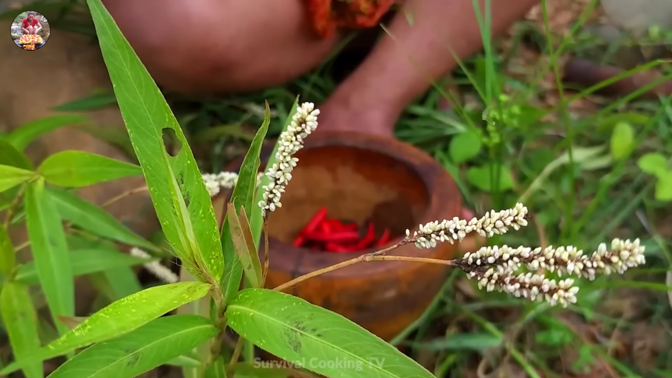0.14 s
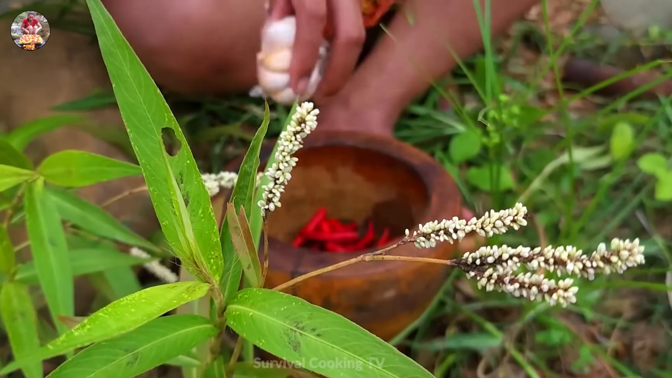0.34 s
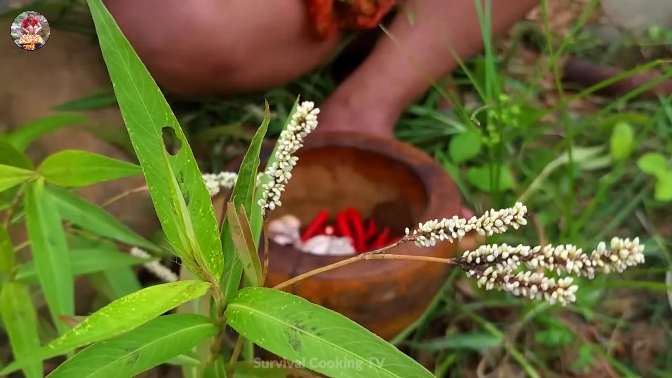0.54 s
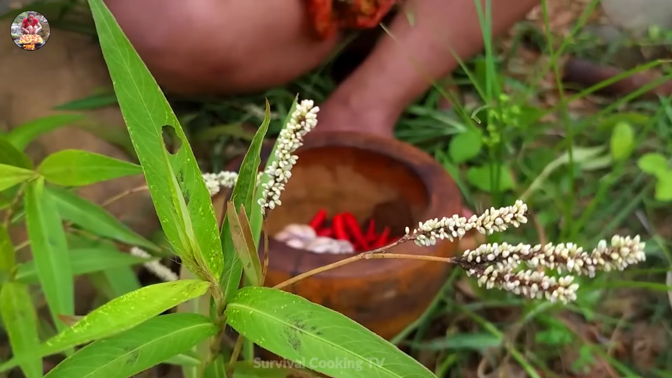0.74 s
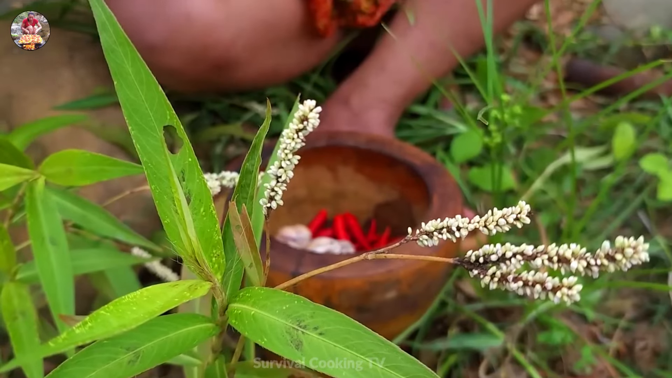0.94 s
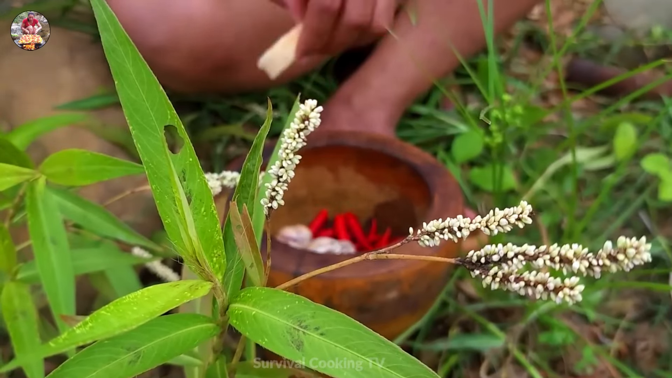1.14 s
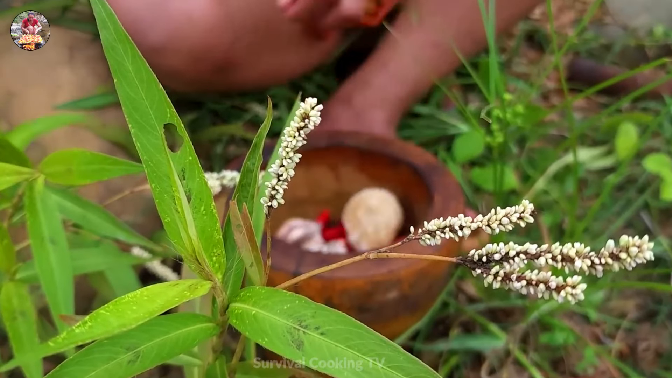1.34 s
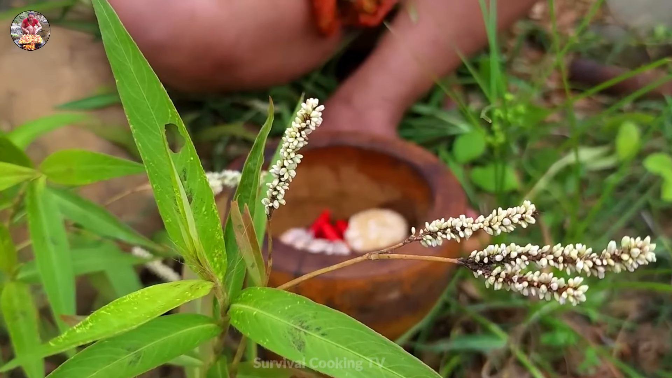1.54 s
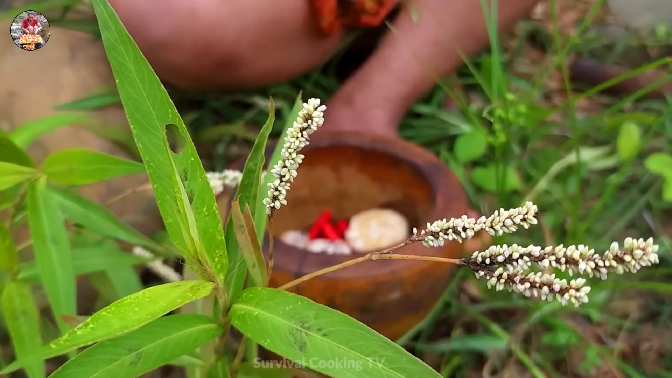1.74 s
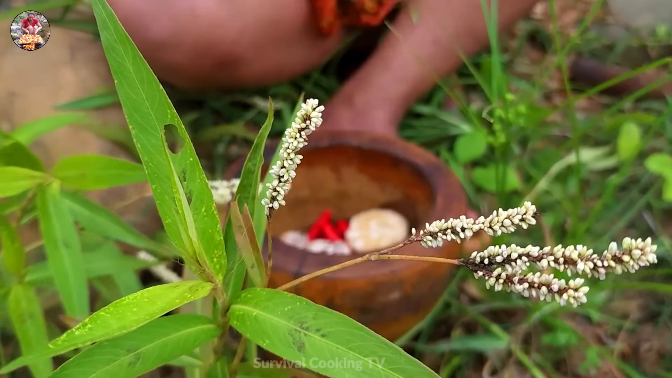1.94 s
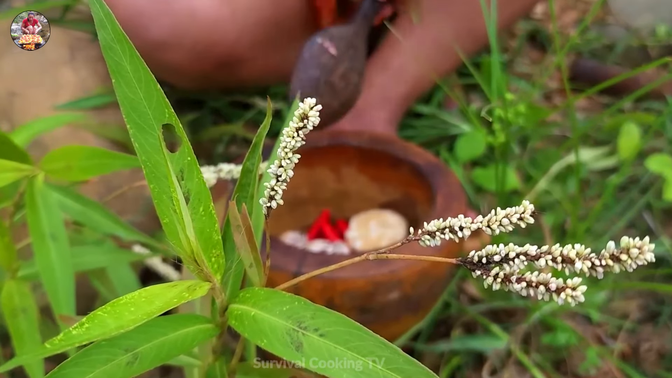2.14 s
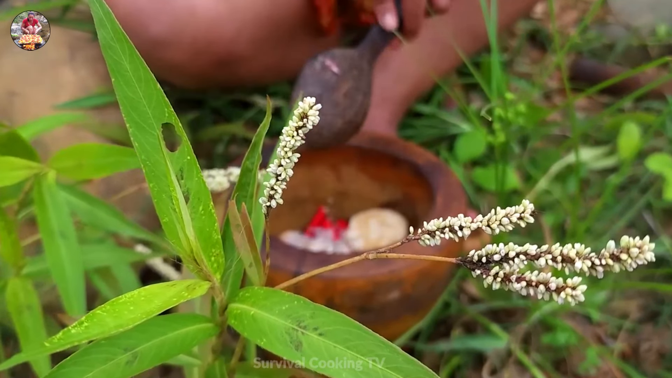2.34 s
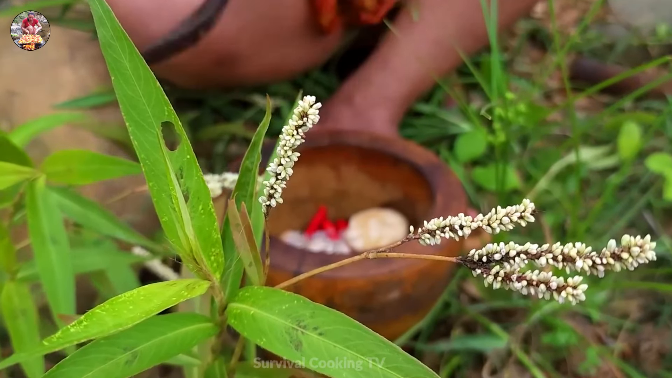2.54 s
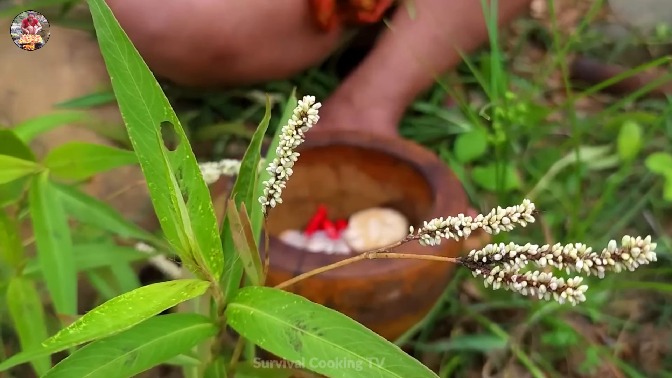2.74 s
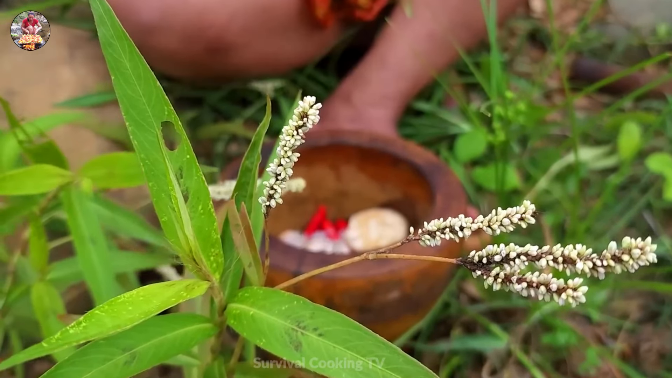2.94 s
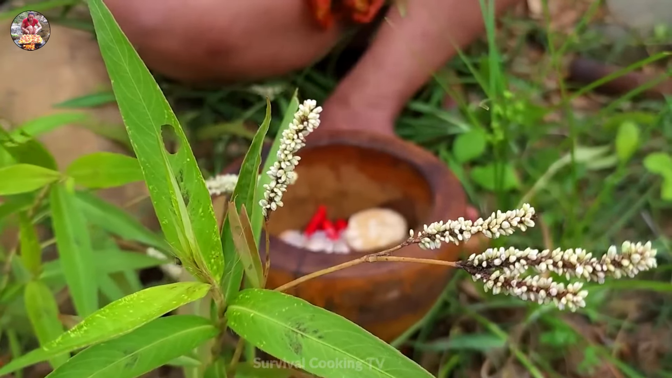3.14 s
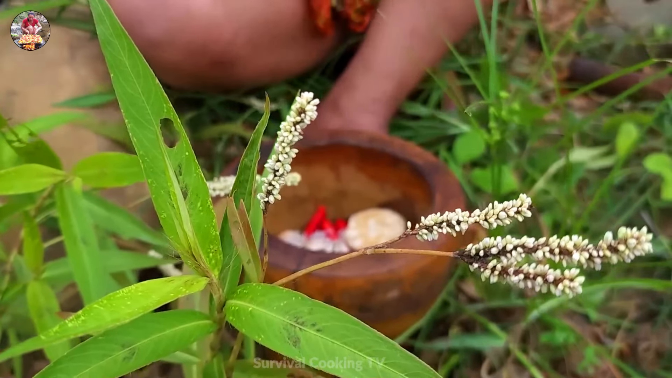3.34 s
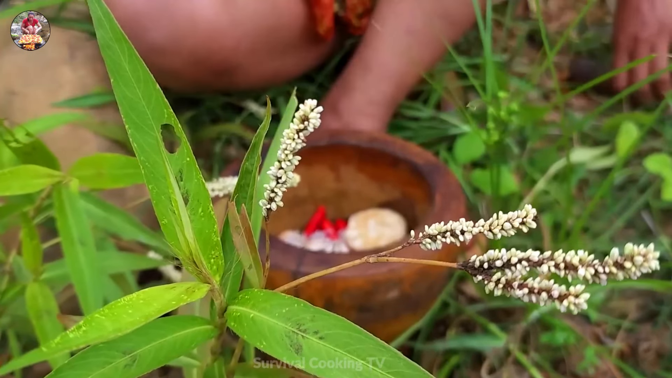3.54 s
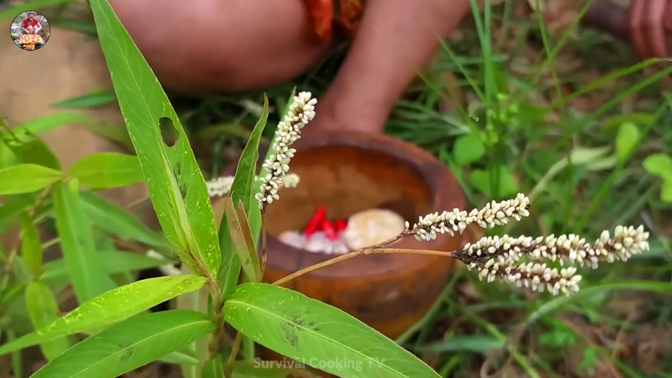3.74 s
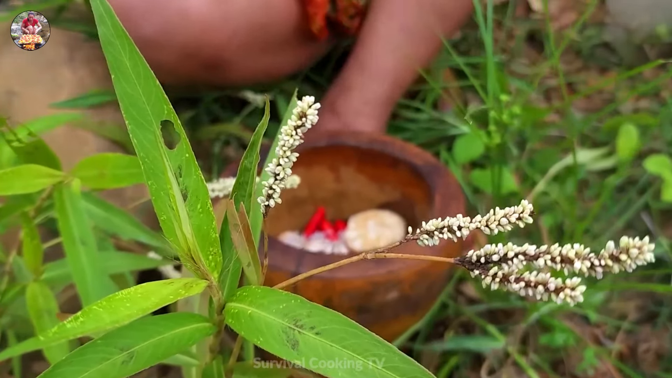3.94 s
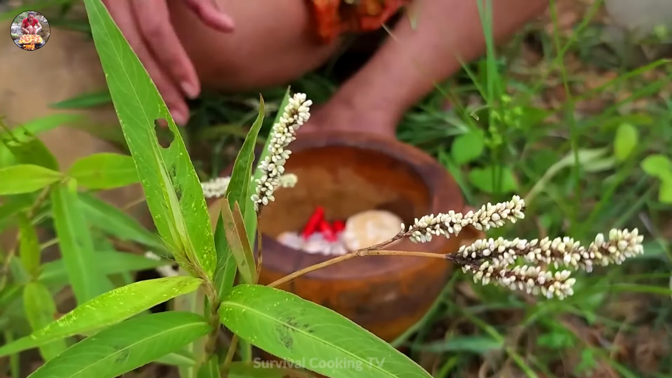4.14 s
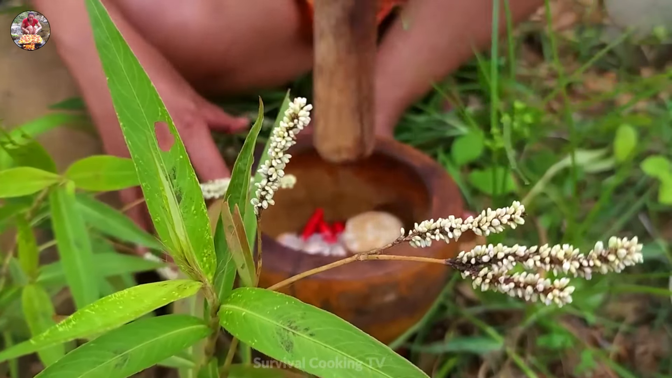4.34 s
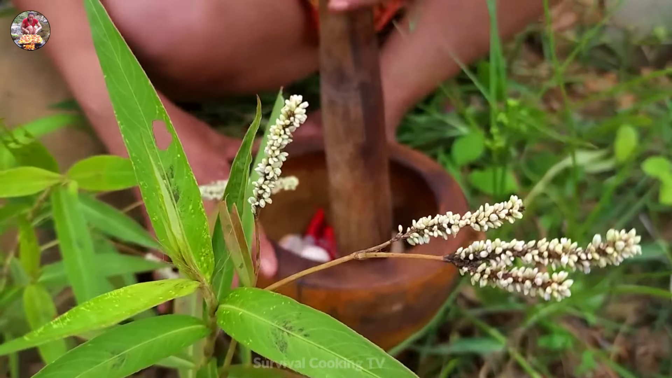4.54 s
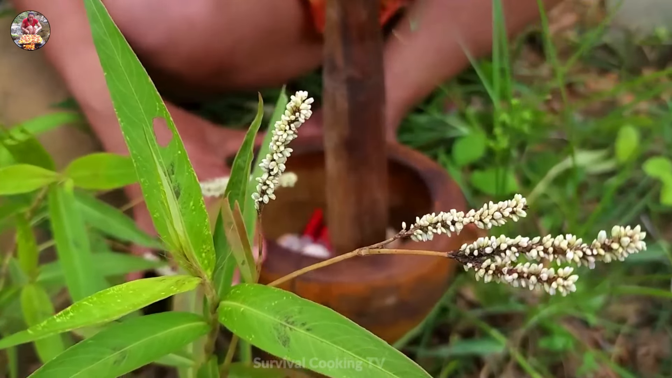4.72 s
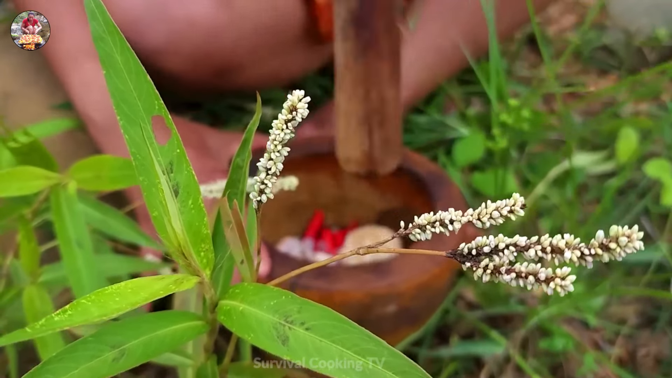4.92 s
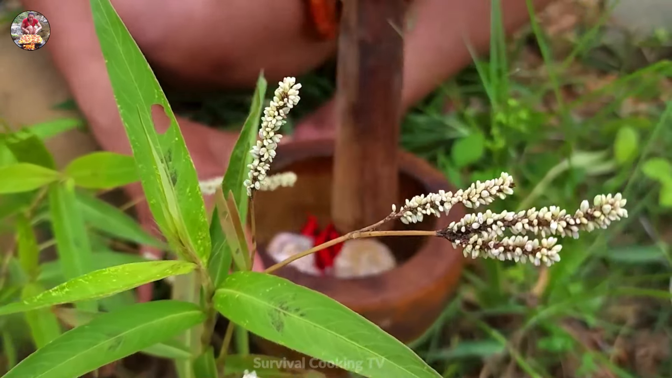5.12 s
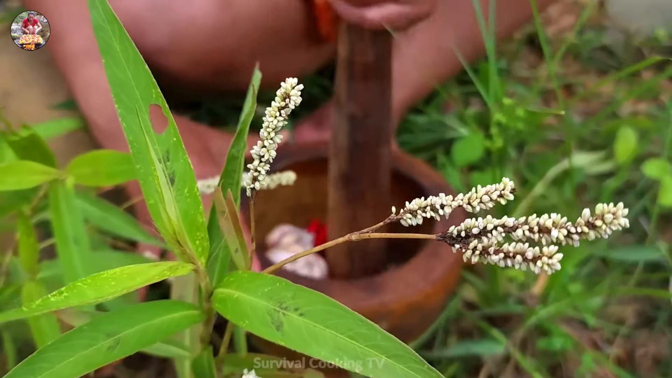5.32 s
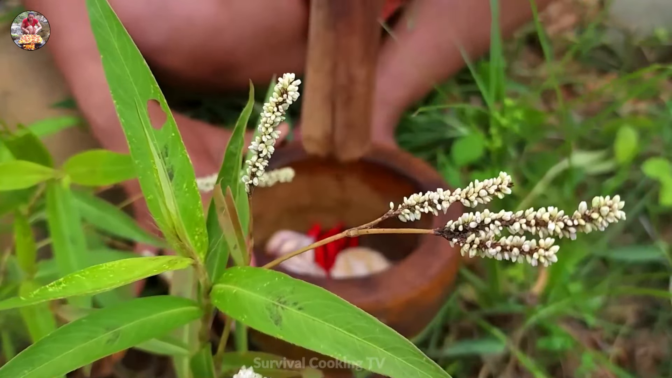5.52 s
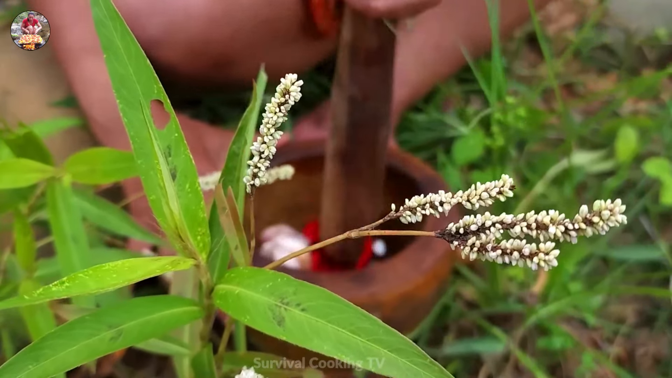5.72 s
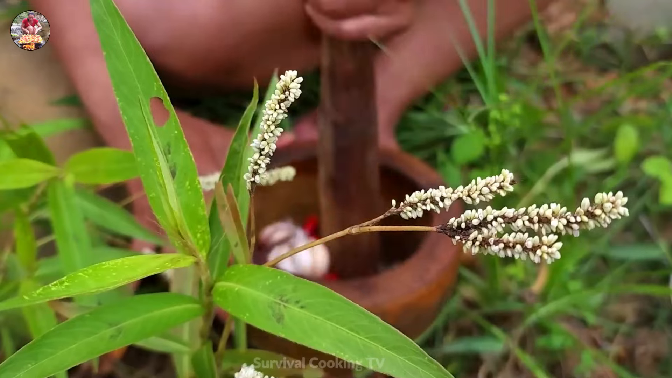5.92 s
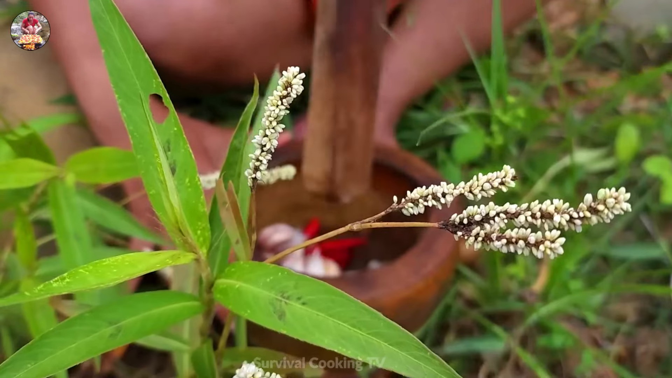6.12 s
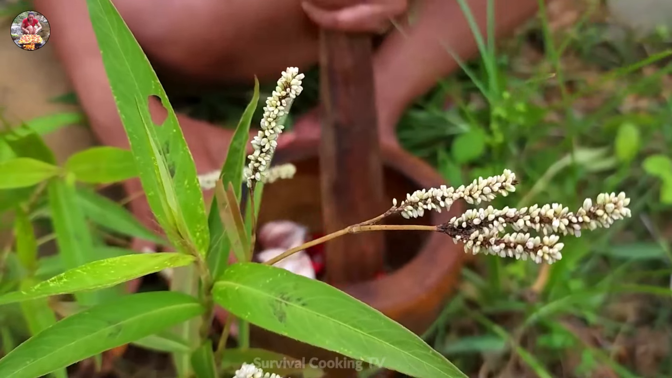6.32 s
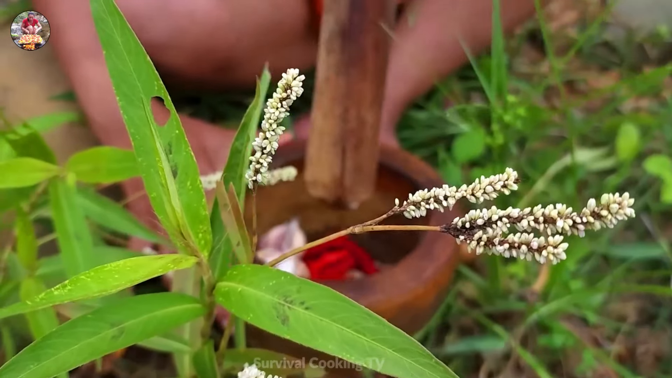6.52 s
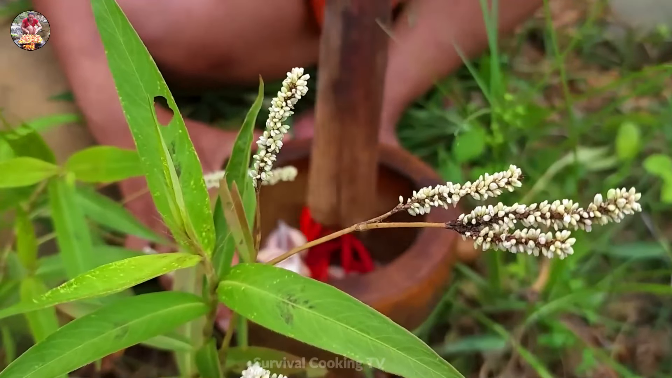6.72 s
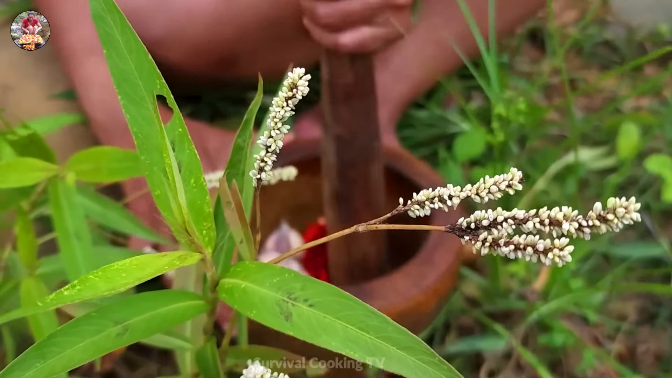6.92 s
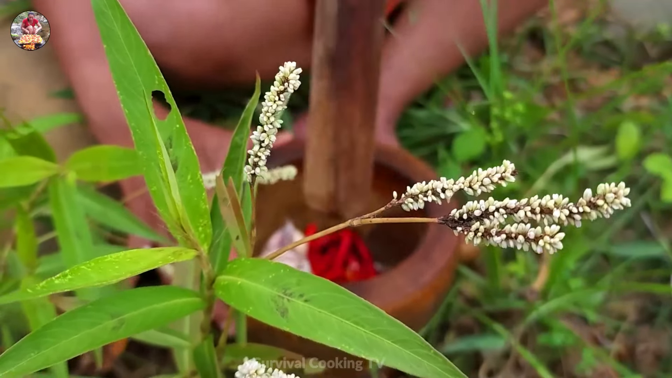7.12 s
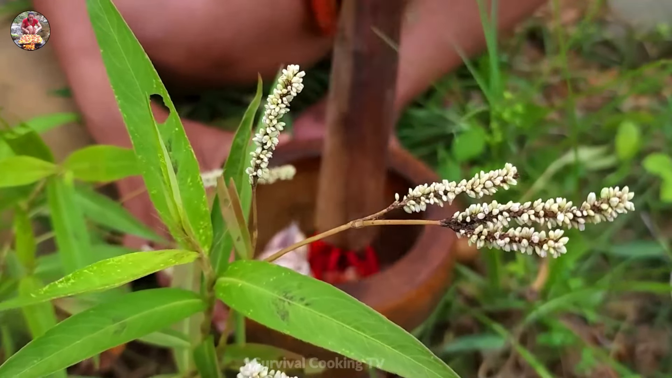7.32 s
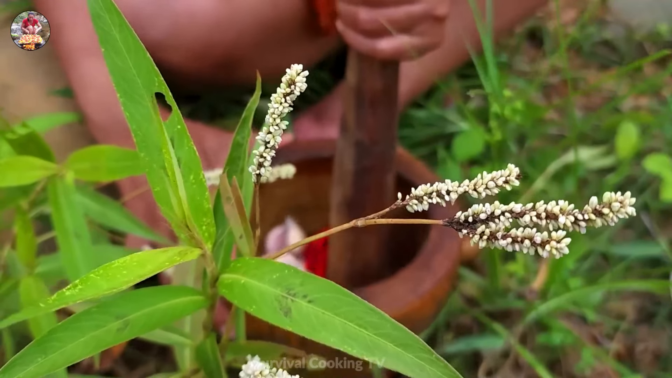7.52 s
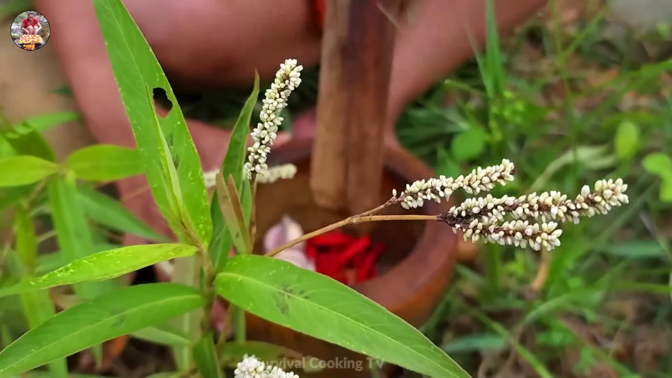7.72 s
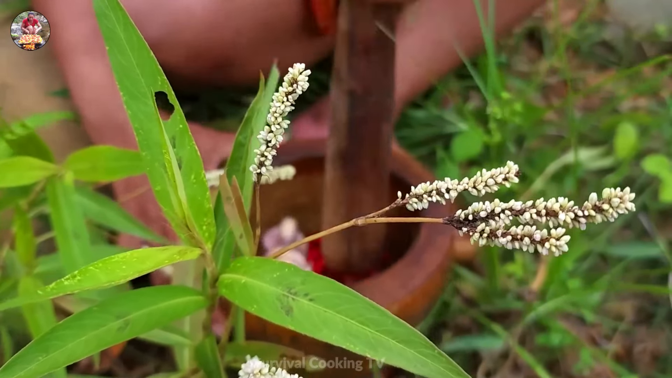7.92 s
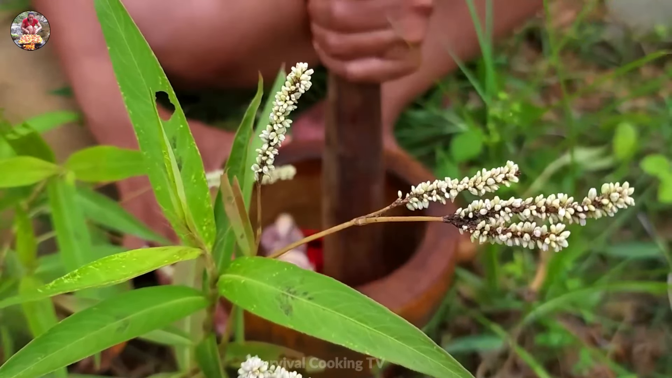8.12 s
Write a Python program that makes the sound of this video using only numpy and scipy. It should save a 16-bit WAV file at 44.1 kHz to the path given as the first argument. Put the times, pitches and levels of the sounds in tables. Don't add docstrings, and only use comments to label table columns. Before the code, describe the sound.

Close to the microphone outdoors, light ingredients rustle into a thick bowl, a hard lump knocks, and salt patters down. After small taps, a wooden pestle pounds about three times a second, first with cracking crunches, then duller, hollow thuds. A cricket chirps rapidly throughout over soft babbling water, low hum and wind bumps, which sink once pounding begins.

```python
import sys
import numpy as np
from scipy import signal
from scipy.fft import rfft, irfft, next_fast_len
from scipy.io import wavfile
from scipy.ndimage import uniform_filter1d

SR = 44100
rng = np.random.default_rng(int(sys.argv[2]) if len(sys.argv) > 2 else 0)


def to_wav(sig):
    pcm = np.clip(np.atleast_2d(sig), -1, 1) * 32767
    pcm = np.round(pcm).astype(np.int16)
    wavfile.write(sys.argv[1], SR, pcm.T)


def boost(x):
    u = np.asarray(x, float) / 20
    return 10 ** u


N = 364707

# frequency [Hz], t60 [s], level [dB].
FULL = [
    [(190, 0.015, 4), (273.3, 0.019, -0.5), (341.4, 0.036, -1.5)],
    [(710, 0.019, 8), (425.4, 0.028, 3.5), (554.5, 0.034, -6.5), (788, 0.003, -9.5), (521, 0.064, -6)],
    [(1269, 0.015, 1.5), (2256, 0.019, -1), (1130, 0.005, -7), (1482, 0.018, 1.5), (1705, 0.035, -1.5),
     (1863, 0.021, 3), (2560, 0.018, -1)],
    [(3030, 0.016, 5), (3270, 0.011, -12), (3580, 0.0042, 7), (4060, 0.0072, 6.5), (4470, 0.0064, 9),
     (5304, 0.019, 3), (5850, 0.0033, 1), (6200, 0.0029, 5)],
    [(7360, 0.0037, 6.5), (8510, .003, -6), (12200, 0.00075, 0.5), (11900, 0.00044, -0.5),
     (14700, 0.0053, -0.5)],
]
# time [s], level [dB].
SURROUNDINGS = [
    (0, 0),
    (4.45, -1),
    (4.52, -6.5),
    (5.7, -8.5),
    (6.9, -11),
    (8.27, -13),
]


def band(x, lo_hz, hi_hz):
    y = signal.sosfilt(signal.butter(3, [lo_hz, hi_hz], "band", fs=SR, output="sos"), x)
    return y / y.std()


def ring(x, hz, t60):
    pole = np.exp(2j * np.pi * hz / SR - np.log(1000) / (t60 * SR))
    return signal.lfilter([1], np.poly([pole, pole * np.exp(-hz / SR)]), x)


def walk(rate, size, step=1):
    steps = np.repeat(rng.standard_normal((size, int(N / SR * rate) + 2)), 16, axis=1)
    steps = 1.3 * uniform_filter1d(uniform_filter1d(steps, 16), 16)
    at = np.arange(0, N, step) * 16 * rate / SR
    return np.array([np.interp(at, np.arange(len(v)), v) for v in steps])


def curve(table):
    s, *columns = np.transpose(table)
    return [np.interp(np.arange(N) / SR, s, c) for c in columns]


def hump(s, span):
    return np.exp(-((np.arange(N) / SR - s) / span) ** 2)


def add(out, x, s):
    i = max(int(s * SR), 0)
    out[:, i:i + x.shape[1]] += x[:, :N - i]


def river():
    # frequency [Hz], level [dB per Hz].
    water = [(140, -8), (228, -10.5), (414, 2.5), (518, -6.5), (660, -2.5), (1000, -6), (1380, -0.5),
             (1800, -10.5), (2250, -4.5), (2700, -14), (3300, -7.5)]
    # frequency [Hz], level [dB per Hz].
    treble = [(2600, -40.5), (3300, 2), (4500, -2), (7000, -6.5), (7500, -4.5), (8100, -9.5), (9000, -13.5),
              (10600, -16.5), (11300, -12), (15000, -14), (15800, -9)]
    duck_db = curve(SURROUNDINGS)[0]
    babble_db, splash_db, hiss_db = -59 + 1.164 * duck_db, -65 + 1.04 * duck_db, -74 + 1.09 * duck_db

    hz, db = np.transpose(water)
    babble = 0
    for c in 160 * 2 ** np.arange(0, 4.4, 1 / 4):
        flicker_db = np.interp(np.log(c), np.log([300, 3000]), [3.1, 1.6]) * walk(28, size=1, step=4)
        gain = boost(np.interp(np.log(c), np.log(hz), db) + flicker_db) * np.sqrt(c)
        noise = rng.standard_normal((2, gain.shape[1]))
        babble = babble + gain * band(noise, 4 * c / 1.09, 4 * c * 1.09)
    babble = signal.resample_poly(babble, 4, 1, axis=1)[:, :N]

    size = next_fast_len(N)
    f = np.maximum(np.fft.rfftfreq(size, 1 / SR), 1)
    hz, db = np.transpose(treble)
    colour = boost(np.interp(np.log(f), np.log(hz), db, left=-90, right=-90))
    spray = rfft(rng.standard_normal((2, size))) * colour
    edges = ((0, 8700), (11100, SR), (8700, 9500), (9500, 10300), (10300, 11100))
    splash, hiss, *dips = (irfft(spray * (f >= lo) * (f < hi))[:, :N] for lo, hi in edges)
    for dip, kept in zip(dips, walk(24, size=3)):
        hiss = hiss + dip * np.clip(2 * kept + 2.4, .1, 1)
    rush = boost(splash_db + 2.5) * splash / splash.std() + boost(hiss_db + 2.5) * hiss / hiss.std()
    return boost(babble_db + 2.5) * babble / babble.std() + boost(2.8 * walk(22, size=1)) * rush


def bass():
    # time [s], level over the steady wind [dB], half length [s].
    gusts = [
        (3.9, 13, 0.033),
        (4.115, 12, 0.046),
        (4.384, 15, 0.047),
        (5.146, 5, 0.38),
        (6.404, 0.5, 0.14),
        (7.987, 9, 0.28),
    ]
    # time [s], lead [radians].
    slip = [(0, -.8), (.35, .4), (.86, -2.8), (2.62, -3.0), (2.71, -3.14), (2.82, -3.4), (3.86, -2.1),
            (4.06, 1.8), (4.47, -2.6), (4.93, -1.3), (5.7, -2.4), (6.0, 1.3), (6.3, 2.3), (6.62, 1.05),
            (7.25, -.6), (8.0, -1.6)]
    duck_db = curve(SURROUNDINGS)[0]
    gust_db = sum(db * hump(s, span) for s, db, span in gusts)
    hum_db = -55 + 0.89 * duck_db
    deep_db = -67 + .7 * duck_db + 0.84 * gust_db
    wind_db = -62.5 + 0.81 * duck_db + gust_db

    hum_hz = 59.3 + 0.53 * walk(6.8, size=1)[0]
    hum = np.sqrt(2) * np.sin(2 * np.pi * np.cumsum(hum_hz) / SR)
    noise = rng.standard_normal((2, N))
    low = boost(hum_db) * hum
    low = low + boost(deep_db + 1.5) * band(noise[0], 28, 52) + boost(wind_db) * band(noise[1], 66, 132.6)

    s, lead = np.transpose(slip)
    lead = lead[np.maximum(np.searchsorted(s, np.arange(N) / SR) - 1, 0)]
    turn = uniform_filter1d(np.cos(lead), 900) - 1j * uniform_filter1d(np.sin(lead), 900)
    return np.array([low, (signal.hilbert(low, next_fast_len(N))[:N] * turn).real])


def peeps():
    # time [s], level [dB], pitch [Hz], fall [Hz], half length [s].
    falling_notes = [
        (0.038, -61, 5850, 198, 0.011),
        (0.061, -58.5, 5420, 100, 0.015),
        (0.139, -58.5, 5700, 400, 0.019),
        (0.158, -59.5, 5700, 100, .014),
        (3.284, -62, 6240, 300, .025),
        (3.307, -56, 5370, 100, 0.015),
        (3.368, -60, 6200, 200, 0.011),
        (3.389, -58, 5470, 500, 0.034),
    ]
    out = np.zeros((2, N))
    for s, db, hz, fall_hz, length in falling_notes:
        t = np.arange(-1, 1, 1 / (length * SR))
        phase = 2 * np.pi * np.cumsum(hz - fall_hz * t / 2) / SR
        blur = uniform_filter1d(uniform_filter1d(rng.standard_normal((2, 2, len(t))), 36), 36)
        peep = np.exp(-3.0 * t ** 2) * (blur[0] * np.sin(phase) + blur[1] * np.cos(phase))
        add(out, boost(db + 20.5) * peep, s - length)
    return out


def cricket():
    # time [s], level [dB], wing pitch [Hz].
    song = [
        (.32, -62, 3740),
        (0.598, -63, 3760),
        (1.365, -54, 3710),
        (2.076, -50.5, 3916),
        (3.301, -44, 4135),
        (4.254, -41, 4154),
        (4.488, -42, 4100),
        (5.697, -45, 4097),
        (7.136, -43.5, 4067),
        (8.07, -44, 4050),
    ]
    chirp_number = [0, 1, 4, 7, 12, 16, 17, 22, 28, 32]
    pan_db = -4.5
    out, t = np.zeros((2, N)), np.arange(2 * SR // 11) / SR
    at = np.arange(.063, .13, 1 / 236)[:, None, None]
    effort = (at - .04) / (at[-1] - .04)
    swell = effort ** 1.32 * np.where(np.arange(len(at)) % 2, .6, 1)[:, None, None]
    shape = np.exp(-((t - at) / 0.0018) ** 2)
    chirps = [np.interp(np.arange(chirp_number[-1] + 1), chirp_number, c) for c in np.transpose(song)]
    for s, db, hz in zip(*chirps):
        chance = rng.standard_normal((3, len(at), 2, 1))
        pitch = hz * (.985 + .024 * effort + (.006 + .025 * effort ** 4) * chance[0])
        phase = 2 * np.pi * (pitch * (t - at) + hz * at) + 1.2 * chance[2]
        wing = (swell * boost(2.6 * chance[1]) * shape * np.sin(phase)).sum(axis=0)
        wing /= np.sqrt(uniform_filter1d(wing ** 2, 700).max(axis=1, keepdims=True))
        noise = rng.standard_normal((2, len(t)))
        lower = ring(noise * np.exp(-((t - .08) / .05) ** 2), .87 * hz, .014).imag
        reeds = ring(noise * np.exp(-((t - .135) / .03) ** 2), 1.03 * hz, .012).imag
        upper = ring(noise * np.exp(-((t - .115) / .012) ** 2), 1.11 * hz, .012).imag
        call = wing + 0.13 * lower / lower.std() + 0.12 * reeds / reeds.std() + 0.067 * upper / upper.std()
        add(out, boost(db - 2.7 + np.array([[pan_db], [-pan_db]]) / 2) * call, s - .113)
    return out * boost(curve(SURROUNDINGS)[0])


def burst(modes, db, delay_ms, rise_ms, fall_ms, smear_ms, smear_db, alike, size=SR // 10):
    ms = np.arange(size) * 1000 / SR - 30 - delay_ms
    push = np.where(ms < 0, np.exp(-(ms / rise_ms) ** 2), np.exp(-abs(ms) / fall_ms))
    push = push + boost(smear_db) * np.exp(-(ms / smear_ms) ** 2)
    y = 0
    for hz, t60, mode_db in modes:
        left, other = rng.standard_normal((2, len(ms)))
        right = alike * left + np.sqrt(1 - alike ** 2) * other
        luck, tune, turn = rng.standard_normal(3)
        z = ring(push * np.array([left, right]), hz * (1 + 0.0085 * tune), t60)
        z[1] *= np.exp(1j * np.sign(turn) * (np.pi / 2 + 0.23 * tune))
        y = y + boost(mode_db + 0.36 * luck) * z.imag / z.imag.std(axis=1, keepdims=True)
    top = np.sqrt(uniform_filter1d(np.mean(y ** 2, axis=0), 180).max())
    return boost(db + 2.5) * y / top


def rustles():
    # time [s], spray [dB], crunch [dB], crack [dB].
    ticks = [(0.4798, -62, -54, -59), (0.5171, -58.5, -45, -50), (0.5433, -54.5, -40, -46.5),
             (1.1862, -56.5, -68, -46.5), (1.2523, -65.5, -76, -46), (1.3144, -56, -47, -54),
             (1.3345, -55.5, -46, -51), (1.607, -65.5, -53, -59), (1.6526, -62, -65, -65),
             (1.7534, -62, -59, -53), (2.189, -56.5, -45, -56), (2.284, -42.5, -51, -61),
             (2.3089, -38, -34, -47), (2.324, -51.5, -35, -38.5), (2.897, -65.5, -74.5, -61),
             (3.0826, -60, -56, -60), (3.989, -64.5, -50, -79), (4.0114, -47.5, -32.5, -55),
             (4.269, -76, -51, -49), (4.441, -68, -63, -66), (4.493, -59, -48, -52),
             (5.213, -66.5, -58, -76), (5.867, -68, -68, -79), (6.412, -63, -47, -70),
             (7.066, -68.5, -65, -75), (8.023, -72, -71, -64)]
    fall_ms = 7.8
    out = np.zeros((2, N))
    for s, spray_db, crunch_db, crack_db in ticks:
        for db, modes in zip((crack_db - 11.5, crunch_db - 13.5, spray_db), FULL[2:]):
            add(out, burst(modes, db, 3.0, .6 * fall_ms, fall_ms, 12., -24., .4, size=SR // 14), s - .03)
    return out


def hit(part_db, body, softness, lag_ms, clean_db):
    # delay [ms], rise [ms], fall [ms], smear [ms], smear level [dB], share alike in both channels.
    contact = [
        (3.73, 2.12, 2.6, 22.4, -33, 1),
        (3.56, 2.23, 2.1, 15.7, -23.5, 0.99),
        (3.8, 2.75, 1.8, 14.8, -19.5, 0.95),
        (6, 7.2, 2.9, 20.6, -22, 1),
        (4, 3.08, 5.2, 12.7, -14, 0.53),
    ]
    base_hz = [150, 783]
    parts = []
    for k, (db, modes, row) in enumerate(zip(part_db, body, contact)):
        delay, rise, fall, smear, smear_db, alike = row
        delay_ms = softness * delay + (k < 2) * lag_ms
        parts.append(burst(modes, db, delay_ms, softness * rise, softness * fall,
                           smear, smear_db - clean_db, alike))
    base = signal.sosfilt(signal.butter(4, base_hz, "band", fs=SR, output="sos"), parts[0] + parts[1])
    return base + 0.56 * parts[0] + sum(parts[2:])


def knocks_and_taps():
    # time [s], bowl [dB], crack [dB],
    # crunch [dB], spray [dB].
    knocks = [
        (1.4245, -34, -25.5, -43, -60),
        (1.46, -53, -49, -70, -70),
        (4.472, -48, -33, -35, -43),
    ]
    # time [s], bowl [dB], crack [dB], crunch [dB], spray [dB].
    taps = [
        (2.985, -40, -46, -48, -44.5),
        (3.023, -54, -44.5, -41.5, -50.5),
        (3.045, -48, -49.5, -50, -72),
        (3.061, -52, -56, -61, -72),
        (3.8, -59.5, -56, -50.5, -63.5),
        (3.905, -50.5, -72, -60, -72),
        (7.69, -61.5, -69, -82, -87),
    ]
    # frequency [Hz], t60 [s], level [dB].
    empty_bowl = [[(250, .03, 0), (340, .03, 0)], [(515, .12, 0), (690, .03, -13)], [(1212, .036, 0),
                  (1456, .02, -10), (1760, .016, -12), (2000, .016, -9), (2330, .016, -11),
                  (2860, .012, -16), (3600, .012, -14)]] + FULL[3:]
    groups = ((knocks[:2], empty_bowl, .55, -23),
              (knocks[2:], empty_bowl[:2] + FULL[2:], .7, -23),
              (taps, FULL, .65, -5.5))
    out = np.zeros((2, N))
    for table, body, softness, thud_db in groups:
        for s, *part_db in table:
            add(out, hit([part_db[0] + thud_db] + part_db, body, softness, -1., 8), s - .03)
    return out


def salt():
    # time [s], level [dB].
    pour = [
        (2.12, -82),
        (2.2, -61),
        (2.27, -59),
        (2.3, -53),
        (2.33, -44.5),
        (2.36, -49.5),
        (2.39, -57.5),
        (2.45, -63),
        (2.56, -88),
    ]
    out, span = np.zeros((2, N)), slice(SR, 4 * SR)
    t = np.arange(N)[span] / SR
    gate = (t > pour[0][0]) & (t < pour[-1][0])
    grain_db = 2.2 * rng.exponential(size=len(t)) + 3 * walk(90, size=1)[:, span]
    grains = rng.standard_normal((2, len(t))) * boost(grain_db)
    top, body, low = band(grains, 11000, 15700), band(grains, 3000, 8200), band(grains, 700, 2800)
    dust = boost(-65) * hump(2.39, 0.61)[span] * (body + boost(-3.5) * top)
    patter = body + boost(-14.0) * top + boost(-10.0) * low
    out[:, span] = gate * boost(curve(pour)[0][span]) * patter + dust
    return out


def favour(modes, *extra_db):
    raised = [(hz, t60, db + 1.5 * more) for (hz, t60, db), more in zip(modes, extra_db)]
    return raised + modes[len(extra_db):]


def pestle_blows():
    # time [s], thud [dB], bowl [dB], crack [dB], crunch [dB].
    blows = [(5.029, -52, -36.5, -27.5, -28), (5.343, -29, -39.5, -27.5, -29.5),
             (5.653, -31.5, -33, -22, -26), (5.964, -26, -31, -28, -35.5), (6.29, -30, -36.5, -27, -27),
             (6.619, -24, -24, -34.5, -35.5), (6.915, -25.5, -23, -34, -36.5),
             (7.223, -30.5, -24, -31.5, -37), (7.53, -32.5, -25.5, -44.5, -43.5),
             (7.841, -35, -23.5, -49, -42.5), (8.151, -30, -22, -43, -38.5)]
    # base [dB], wall [dB].
    landing = [(-7, -7.5), (3, -3.5), (-11, -10.5), (3.5, -12.5), (-2, 3), (3, -0.5), (1, -5.5), (-0.5, 4),
               (-4.5, -9), (-2, -3.5), (1.5, -2.5)]
    out = np.zeros((2, N))
    for (s, thud_db, bowl_db, crack_db, crunch_db), (base_db, wall_db) in zip(blows, landing):
        lag_ms = 0.37 + 0.33 * max(crack_db - bowl_db, 0)
        since = s - blows[0][0]
        spray_db = -8 + since - 5.5 * np.exp(-(since / .45) ** 4)
        shaft_db = 8 * np.exp(-(s - 6.24) ** 2)
        body = [favour(FULL[0], base_db), favour(FULL[1], wall_db), favour(FULL[2], 0, shaft_db)] + FULL[3:]
        part_db = (thud_db, bowl_db, crack_db, crunch_db, crunch_db + spray_db)
        add(out, hit(part_db, body, 1., lag_ms - 1.5, 0), s - .03)
    return out


def scene():
    background = river() + bass() + peeps() + cricket()
    return background + rustles() + knocks_and_taps() + salt() + pestle_blows()


def band_limit(x):
    return signal.sosfilt(signal.butter(12, 16460, fs=SR, output="sos"), x)


def record(dry):
    mix = signal.sosfilt(signal.ellip(8, .2, 60, 15900, fs=SR, output="sos"), dry)
    return band_limit(mix)


dry = scene()
out = record(dry)
to_wav(out)
```